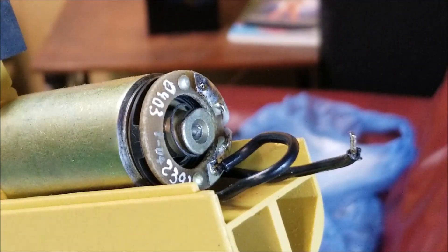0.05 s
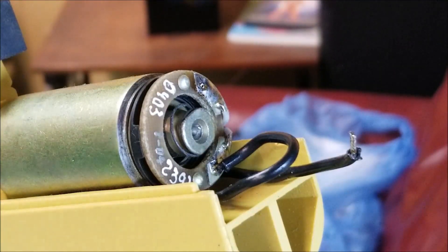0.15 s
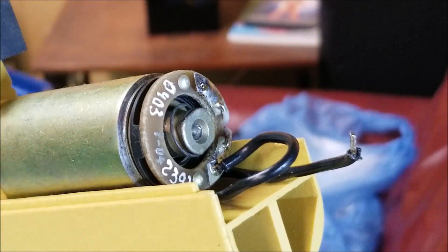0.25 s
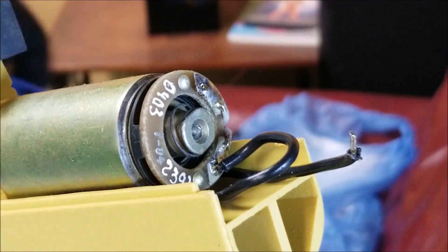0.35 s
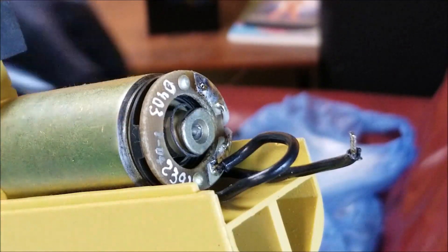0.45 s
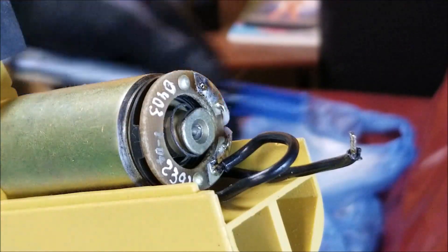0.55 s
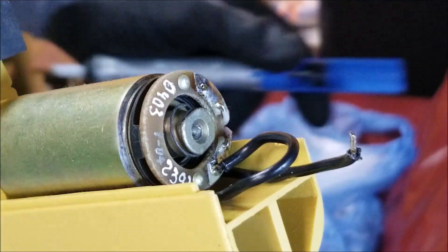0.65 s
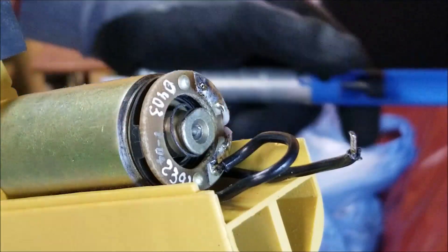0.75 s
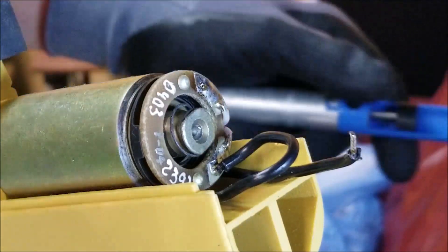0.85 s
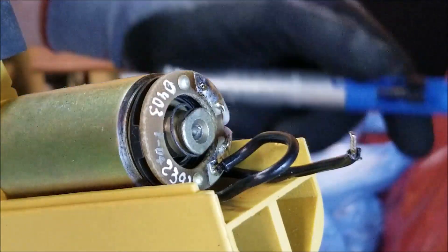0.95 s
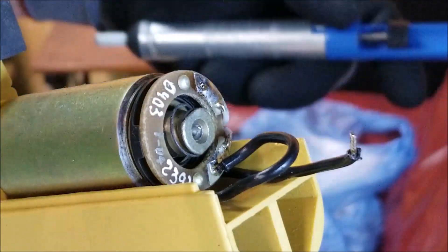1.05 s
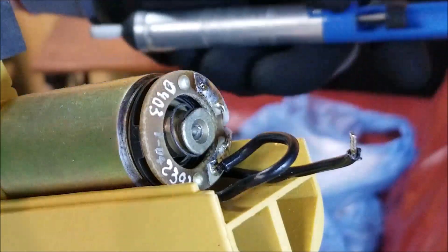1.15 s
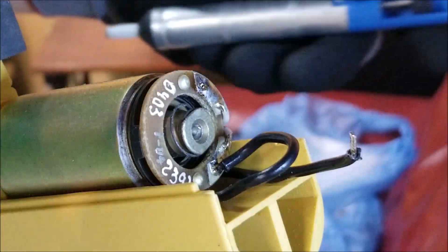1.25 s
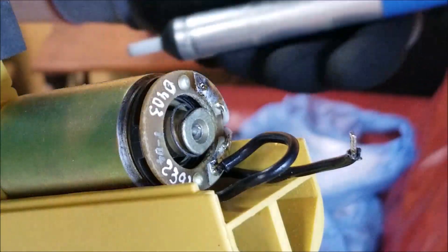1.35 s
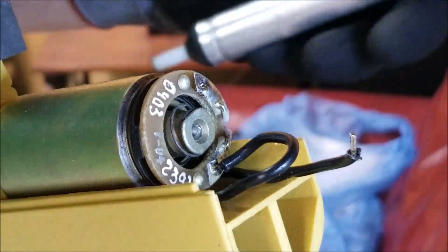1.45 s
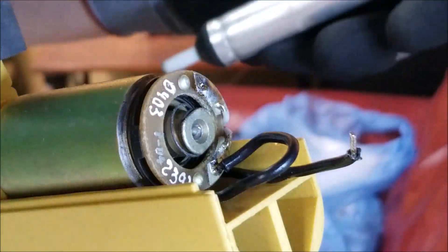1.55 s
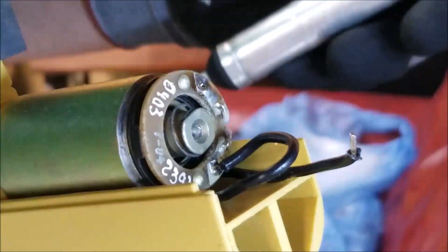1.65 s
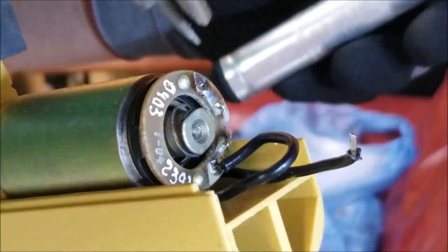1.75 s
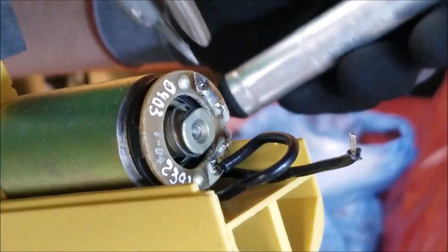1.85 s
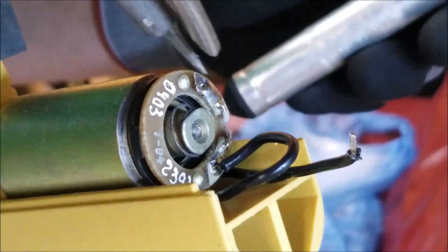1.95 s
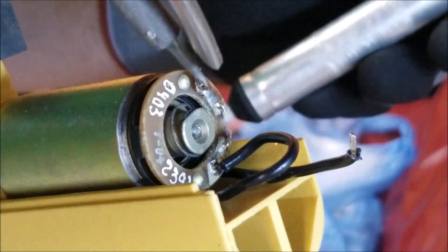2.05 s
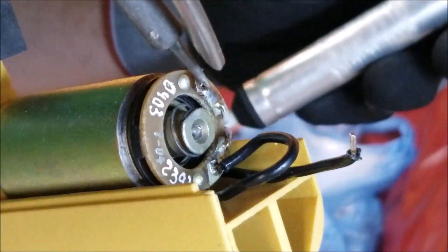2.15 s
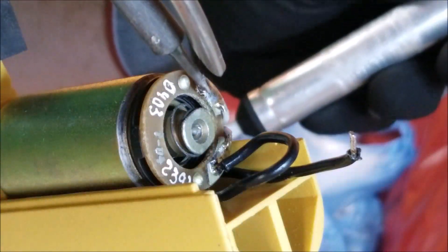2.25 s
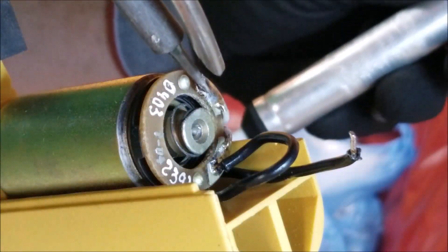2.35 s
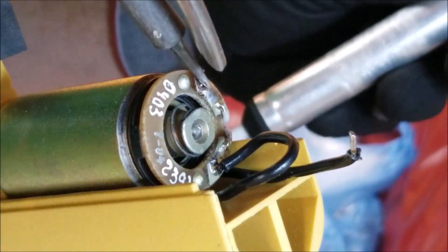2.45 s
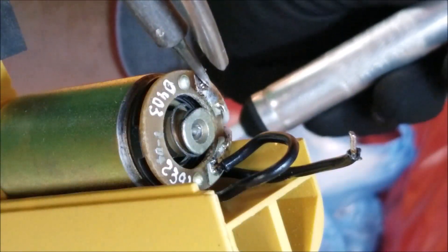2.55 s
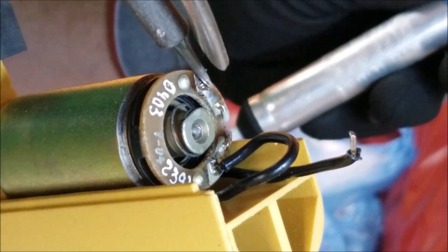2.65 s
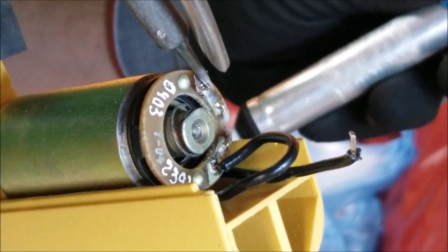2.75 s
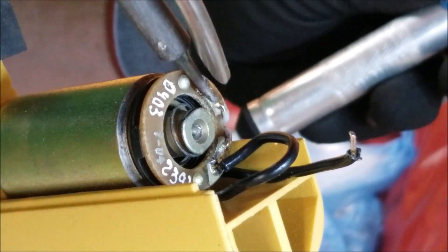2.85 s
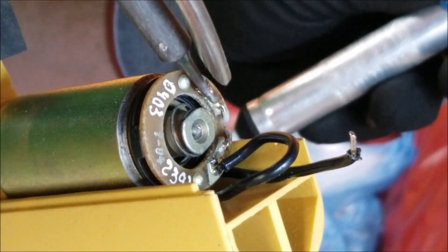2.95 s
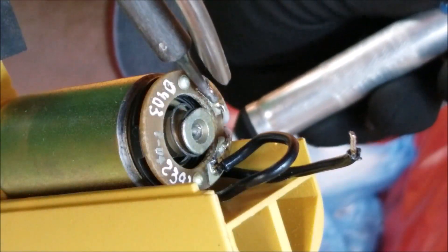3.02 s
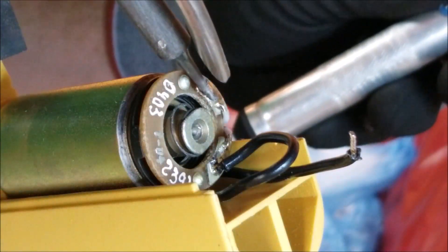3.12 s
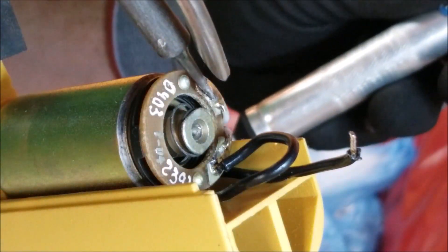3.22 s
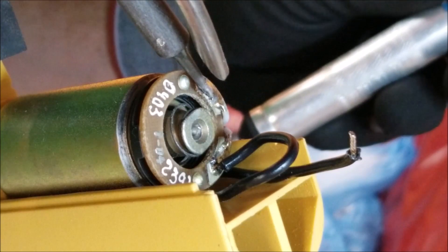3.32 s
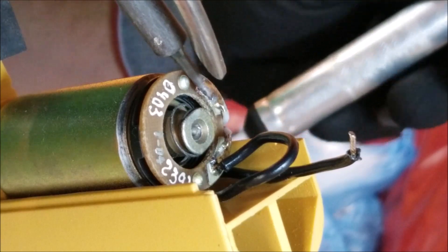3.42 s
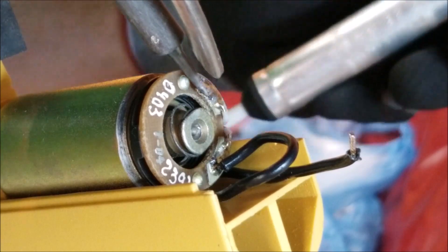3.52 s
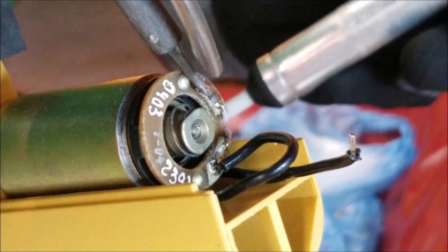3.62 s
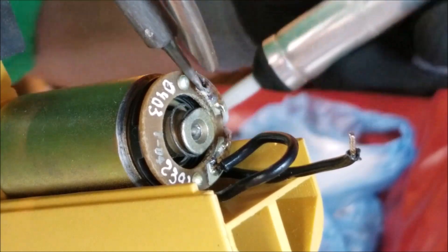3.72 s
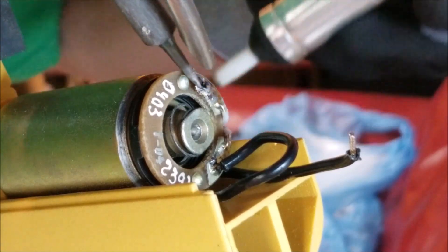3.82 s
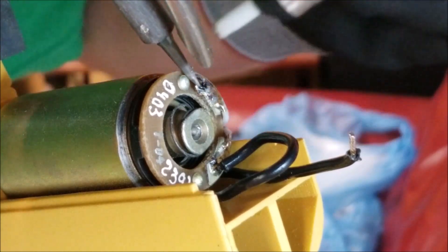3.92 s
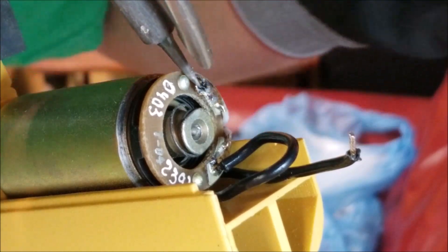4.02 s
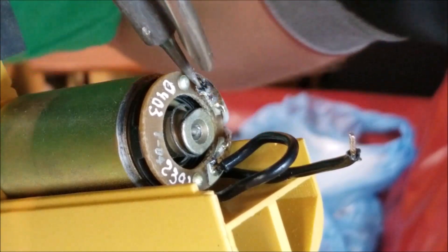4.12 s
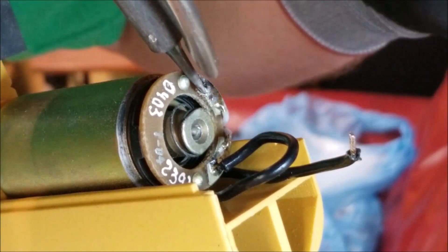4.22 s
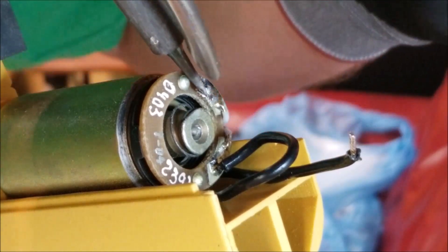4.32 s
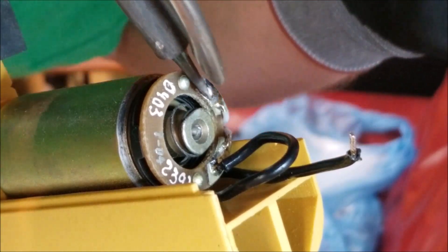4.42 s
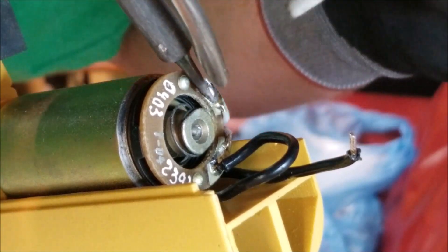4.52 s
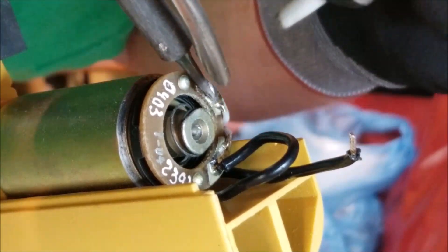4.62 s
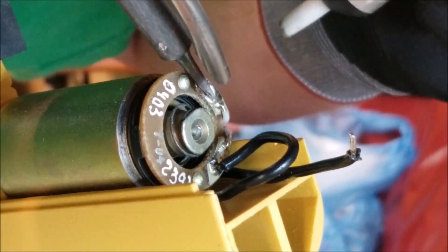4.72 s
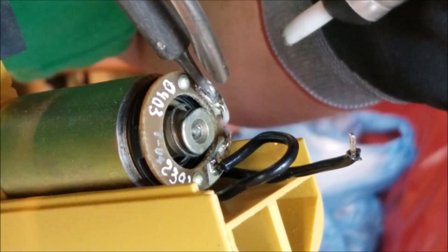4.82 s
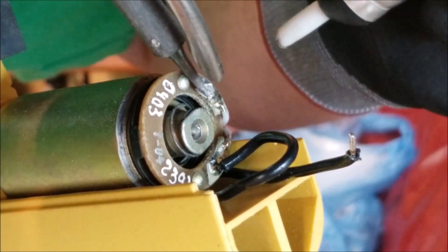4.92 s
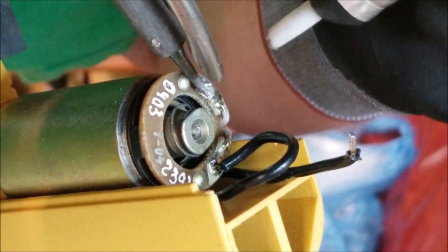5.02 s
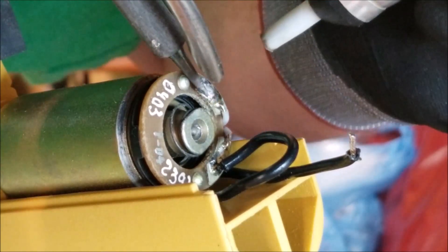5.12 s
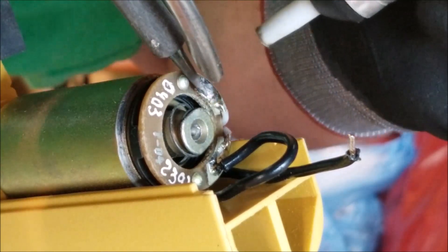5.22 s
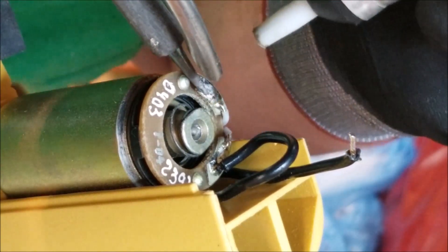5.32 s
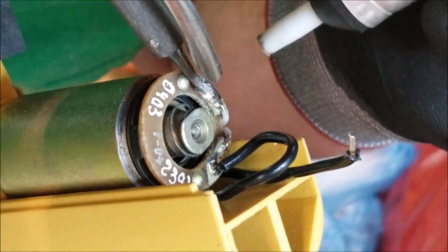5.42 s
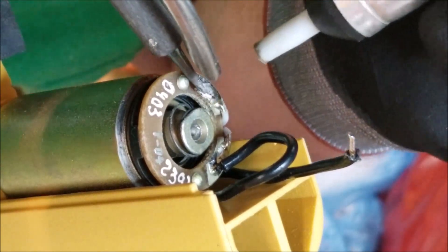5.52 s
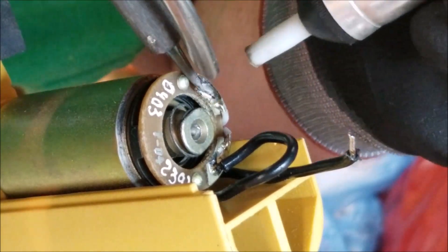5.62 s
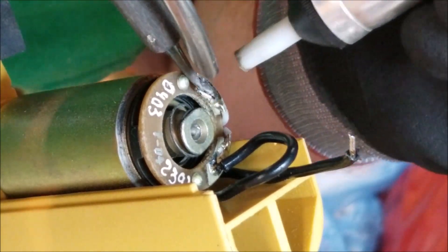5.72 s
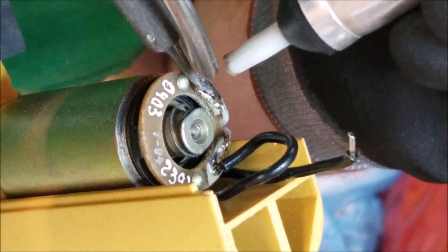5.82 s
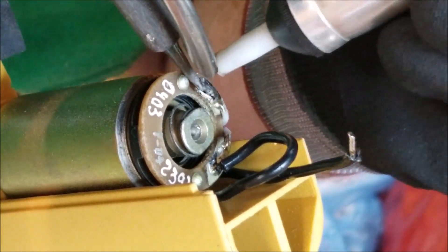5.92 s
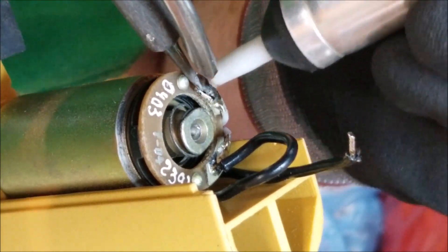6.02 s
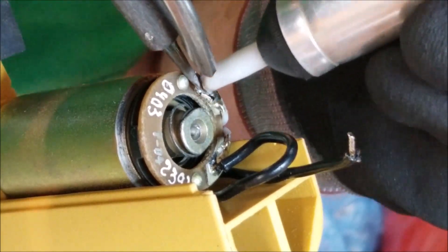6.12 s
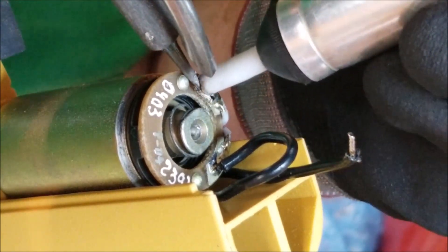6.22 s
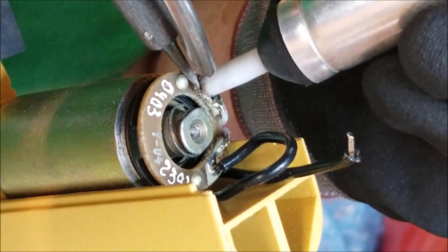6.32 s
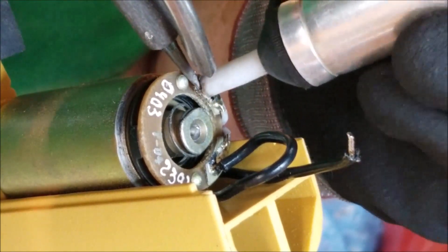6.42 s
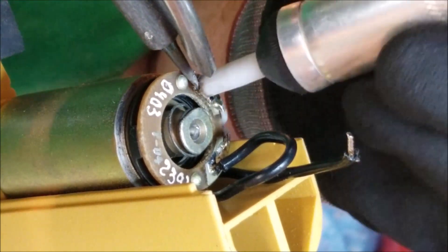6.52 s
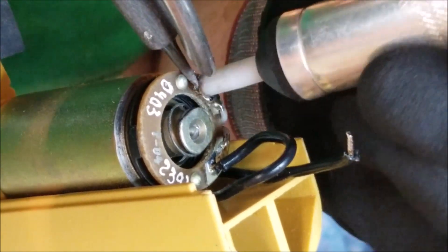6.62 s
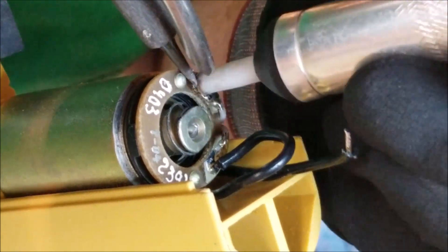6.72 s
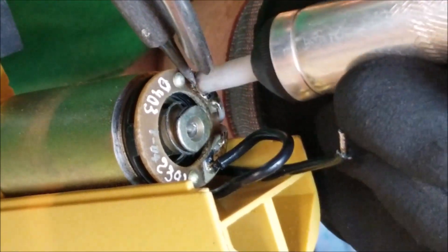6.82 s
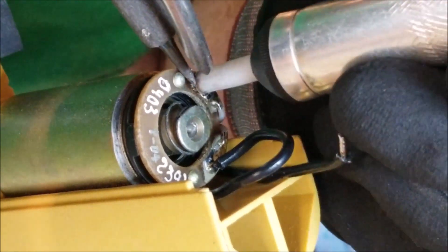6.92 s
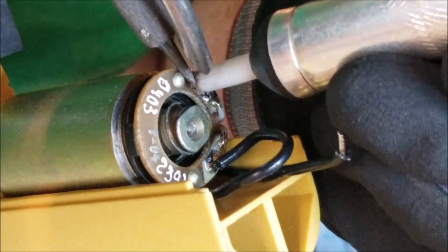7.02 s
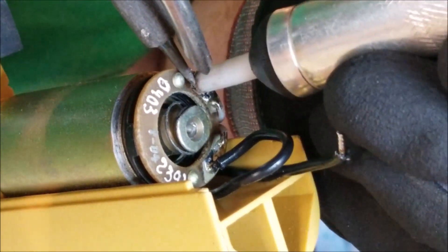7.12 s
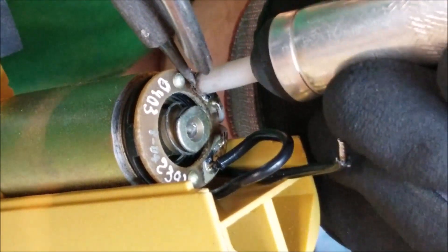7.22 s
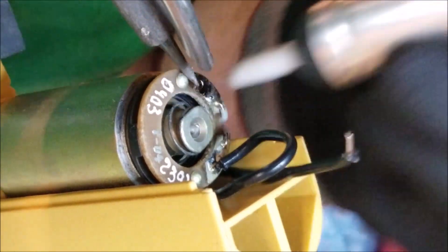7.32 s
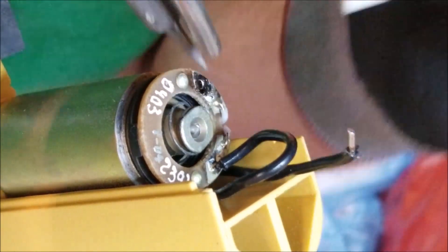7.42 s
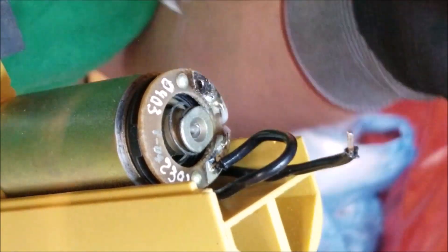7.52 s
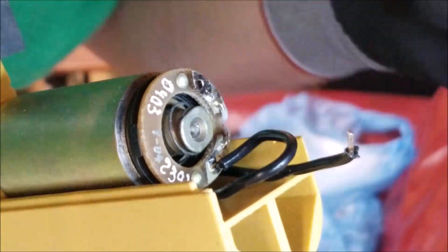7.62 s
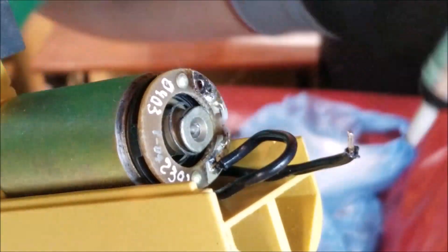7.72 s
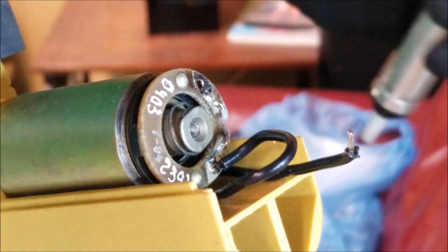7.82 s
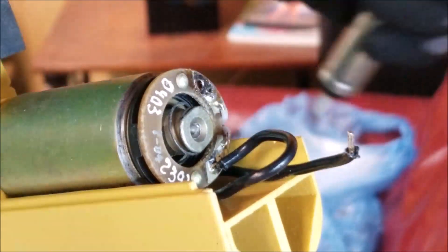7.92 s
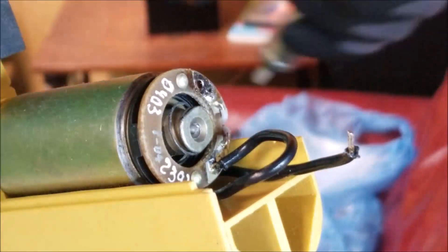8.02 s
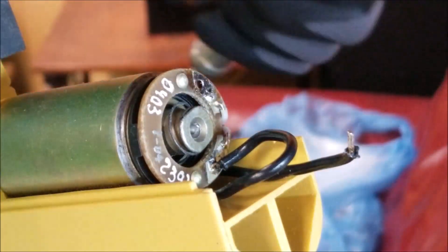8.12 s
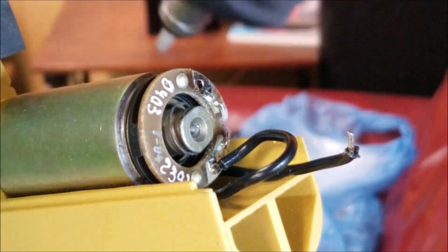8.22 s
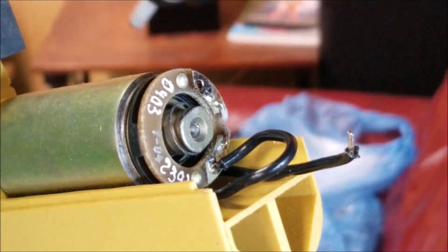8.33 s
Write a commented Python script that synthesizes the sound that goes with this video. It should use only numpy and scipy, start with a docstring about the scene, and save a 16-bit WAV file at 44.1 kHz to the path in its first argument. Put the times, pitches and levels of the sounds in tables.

```python
"""A spring-loaded solder sucker fires once, heard close by: scraping noise rings its tube, metal blows
crack and pop, and decaying sines are the spring. A light metal tick follows as the tools lift off the joint.
Soft bumps come through the bench as dull decaying sines. Around them mains equipment buzzes in sine harmonics,
and a fan runs as coloured noise with motor tones. Hands move near the microphones: the steady levels follow
them, and the high hiss is combed by an echo off the hand."""
import sys
import numpy as np
from scipy import signal
from scipy.fft import rfft, irfft
from scipy.io import wavfile
from scipy.ndimage import uniform_filter1d, map_coordinates

SR = 44100
rng = np.random.default_rng(int(sys.argv[2]) if len(sys.argv) > 2 else 0)


def wav_out(sig):
    """Save sig, one row per channel (or a flat mono array), as 16-bit PCM at SR to the path in sys.argv[1]."""
    wavfile.write(sys.argv[1], SR, np.round(np.clip(np.atleast_2d(sig).T, -1, 1) * 32767).astype(np.int16))


N = 368764
TIME = np.arange(N) / SR
MAINS_HZ = 60.003

# mains harmonics that stand out, before hands and wavering: multiple, left level/dB, right level/dB
MAINS_LINES = [(2, -55.5, -56.5), (3, -58, -59), (4, -69, -64), (5, -72, -67), (7, -78, -92), (8, -80, -67),
               (9, -66.5, -88), (10, -61.5, -64.5), (11, -73.5, -72), (12, -73, -66), (13, -71.5, -88),
               (14, -70.5, -80.5), (15, -70.5, -80.5), (22, -70, -73), (24, -65.5, -71), (27, -68.5, -68.5),
               (30, -67.5, -80), (44, -68.5, -86)]
# lag of the left microphone behind the right: f/Hz, lag/rad
LEFT_LAG = [(250, 0), (800, .3), (1500, 2), (2400, 3.1), (6200, 3), (7200, 1.6), (8600, .3), (9800, 1.4),
            (11000, -.5), (12200, 0), (14500, -2.6)]
# a hand sweeps past the microphones: t/s, half length/s, change of hiss level/dB,
# extra change of its lower part/dB, shortest detour of the echo/ms
HAND_SWEEPS = [(0.822, .22, 3, -1, 0.35), (1.397, 0.224, 2.5, 0.2, 0.33), (7.685, 0.154, -1.7, 3, 0.54),
               (8.14, 0.22, 2, .3, 0.64)]
# the fan's rush with hands away, with hands at the joint, and the change while one sweeps past
RUSH_AWAY_DB, RUSH_NEAR_DB, RUSH_SWEEP_DB = -5, -1.03, -0.34


def amp(db):
    """Decibels to gain."""
    return 10 ** (np.asarray(db) / 20)


def unit(x):
    """Scales to rms 1."""
    return x / np.sqrt(np.mean(x ** 2) + 1e-20)


def at_hz(points, hz):
    """Reads a spectrum on a log-frequency axis."""
    f, value = np.transpose(points)
    return np.interp(np.log(hz + 1), np.log(f + 1), value)


def pan(lean_db):
    """Left and right gains for a level difference, left minus right."""
    return amp(np.array([[.5], [-.5]]) * lean_db)


def add(mix, s, sound):
    """Mixes a sound in at time s."""
    part = mix[:, round(s * SR):][:, :sound.shape[-1]]
    part += sound[..., :part.shape[1]]


def drift(rate_hz):
    """Slow random wander of rms 1; its spectrum falls off exponentially with the given rate."""
    coarse_hz = np.fft.rfftfreq(N // 100, 100 / SR)
    z = rfft(rng.standard_normal(N // 100)) * np.exp(-coarse_hz / rate_hz)
    slow = unit(irfft(z))
    return np.interp(np.arange(N) / 100, np.arange(len(slow)), slow)


def noise(colour, size, slant=1):
    """Coloured noise at two microphones; sound from the side (slant 1) reaches them out of step."""
    # likeness of the two microphones: f/Hz, correlation (-1 to 1)
    likeness = [(60, 0), (200, 0.77), (450, 0.63), (800, 0), (1300, -0.37), (2600, -0.21), (4000, 0.18),
                (6300, 0.35), (7200, 0.55), (8700, 0), (14500, 0.34)]
    # balance of the two microphones: f/Hz, left minus right level/dB
    balance = [(60, -7), (250, 5.5), (450, 3.5), (750, -3.5), (1200, 3.5), (2400, 1.5), (3500, 0),
               (6000, 1.5), (8000, 2.5), (12000, 2.5), (15500, 1)]
    hz = np.fft.rfftfreq(size, 1 / SR)
    a, b = rfft(rng.standard_normal((2, size)))
    same = np.clip(at_hz(likeness, hz), -1, 1)
    left = a * np.exp(-1j * slant * at_hz(LEFT_LAG, hz))
    right = same * a + np.sqrt(1 - same ** 2) * b
    return unit(irfft(np.array([left, right]) * amp(at_hz(colour, hz)) * pan(at_hz(balance, hz)), size))


def highs(x, edge_hz):
    """Keeps what lies above the edge."""
    return signal.sosfilt(signal.butter(2, min(edge_hz, SR / 3), "high", fs=SR, output="sos"), x)


def sucker(slam_s=7.068, spring_db=-58):
    """Scrapes, hard contacts (the tick's among them) and the spring that rings on after the slam."""
    # scrapes of the piston: t/s, length/s, level/dB, left minus right/dB, tube ring/dB, treble/dB
    strokes = [(7.0502, 0.0079, -33.5, -2, 1, -2), (7.0582, 0.0088, -25, 5.5, -1.5, 1),
               (7.067, 0.0053, -32.5, 0, -19, -6), (7.07, 0.0045, -33, -12, -10, -2)]
    # blows of metal on metal: t/s, level/dB, t60/s, hollow pop relative to level/dB, low edge f/Hz
    hits = [(7.058, -23.5, 0.0042, 0, 400), (7.0579, -30, 0.0034, -23, 2000),
            (7.0661, -17, 0.014, -15, 400), (7.0677, -17.5, 0.0048, 4, 700), (7.3438, -43, .008, -40, 9000),
            (7.3450, -36, .007, -40, 5000)]
    # ringing modes of spring and barrel, most of them between 1.5 and 2.5 kHz:
    # f/Hz, level relative to spring_db/dB, t60/s
    spring_modes = [(1530, -4, .2), (1725, -1, .28), (1815, -2, .25), (2030, 6, 0.24), (2150, -4, .3),
                    (2270, 0, 0.38), (2450, -4, .3), (3320, -16, .7), (4630, -14, .36), (5766, -13, .28),
                    (6245, -19, .7), (12440, -16, .46)]
    out, t = np.zeros((2, N)), np.arange(SR) / SR
    for s, *stroke in strokes:
        add(out, s, scrape(*stroke))
    for s, *hit in hits:
        add(out, s, blow(*hit))
    for hz, db, t60 in spring_modes:
        swing = np.sin(2 * np.pi * (hz * t + rng.random((2, 1))))  # own phase at each microphone
        add(out, slam_s, amp(spring_db + db - 60 * t / t60) * swing)
    return out


def scrape(length, level_db, lean_db, ring_db, treble_db, grit=0.28):
    """The piston chatters along the wall and rings the tube."""
    # colour of the rubbing: f/Hz, density/dB per Hz
    rub_colour = [(100, -3), (280, -7), (420, -2), (800, -1), (1500, -8), (2500, 1.5), (4300, 2),
                  (6000, -4), (7400, 1), (9300, -5.5), (12300, 7.5), (14500, -3), (16000, -11)]
    # resonances of the tube and its air: f/Hz, width/Hz, left level/dB, right level/dB
    tube_modes = [(2400, 300, 0.5, -5), (3300, 120, -4, -1), (4900, 300, -11, -10), (6100, 460, -12, -1),
                  (12000, 350, -15, -20)]
    t = np.arange(2048) / SR
    push = np.clip(t / 0.00029, 0, 1) * np.exp(-np.maximum(t - length, 0) / 0.00061)
    roughness = unit(uniform_filter1d(rng.standard_normal(len(t)), 20))
    chatter = unit(np.exp(grit * roughness))
    rub = noise(rub_colour, len(t), slant=0.72) * chatter
    rub = (rub + (amp(treble_db) - 1) * highs(rub, 7000)) * push
    ring = np.zeros_like(rub)
    for hz, width, left_db, right_db in tube_modes:
        mode = np.exp(-np.pi * width * t) * np.sin(2 * np.pi * hz * t)
        rung = np.array([unit(signal.fftconvolve(side, mode)[:len(t)]) for side in rub])
        ring += amp([[left_db], [right_db]]) * rung
    sound = unit(unit(rub) * pan(lean_db) + amp(ring_db) * unit(ring))
    return amp(level_db) * sound * np.sqrt(np.mean(push ** 2))


def blow(level_db, t60, pop_db, edge_hz, pop_lean_db=9, pop_hz=1700, pop_t60=0.0048):
    """A hard contact: a short crack and the pop of the air in the barrel."""
    # colour of the crack: f/Hz, density/dB per Hz
    crack_colour = [(200, -13), (300, -8), (430, 8.5), (800, -4), (1200, 4), (2200, -2), (3500, 6),
                    (4800, -3), (6200, 5), (7050, 3), (7700, -5), (8300, 2.5), (9500, -6), (12500, 5),
                    (16000, -12)]
    t = np.arange(2048) / SR
    fade = amp(-60 * t / t60)
    crack = unit(highs(noise(crack_colour, len(t), slant=0.58), edge_hz) * fade)
    crack = crack * np.sqrt(np.mean(fade ** 2))
    pop = np.sin(2 * np.pi * pop_hz * t) * amp(pop_db - 60 * t / pop_t60) * pan(pop_lean_db)
    return amp(level_db) * (crack + pop)


def tick():
    """A small steel tool rings for a few milliseconds."""
    # ringing modes: t/s, f/Hz, peak level/dB, t60/s
    tool_modes = [(7.345, 4650, -50, .007), (7.345, 5800, -42, .008), (7.345, 7700, -44, 0.0065)]
    out, t = np.zeros((2, N)), np.arange(2048) / SR
    for s, hz, db, t60 in tool_modes:
        add(out, s, amp(db - 60 * t / t60) * np.sin(2 * np.pi * hz * t))
    return out


def bench():
    """Each bump gives a few dull swings, the same at both microphones."""
    # bumps through the bench: t/s, level before the soft onset/dB, f/Hz, t60/s
    bumps = [(4.912, -43, 85, 0.08), (6.2814, -35, 350, 0.017), (6.284, -27.5, 115, 0.032),
             (6.2893, -43, 62, .07), (7.0555, -26.5, 176, 0.045), (7.0683, -27, 172, 0.028)]
    out, t = np.zeros((2, N)), np.arange(SR // 4) / SR
    for s, db, hz, t60 in bumps:
        onset = 1 - np.exp(-t / 0.00085)
        add(out, s, amp(db - 60 * t / t60) * np.sin(2 * np.pi * hz * t) * onset)
    return out


def nearby(x):
    """Adds the first echoes off the things on the bench, which ripple the spectrum."""
    # echoes: delay/ms, left gain, right gain
    echoes = [(1.13, -0.21, 0.0081), (1.9, 0.3, -0.059), (3.1, -0.18, 0.39), (4.7, 0.4, 0.15),
              (7.3, 0.11, 0.13), (10.6, -0.17, -0.000074)]
    out = x.copy()
    for delay_ms, left, right in echoes:
        add(out, delay_ms / 1000, x * np.array([[left], [right]]))
    return out


def closeness(arrive_s=0.36, arrive_length_s=0.49, leave_s=7.14, leave_length_s=.3, linger=0.83):
    """How near the hands are to the joint, 0-1: approach, hold, partial retreat down to linger."""
    arrived = np.clip((TIME - arrive_s) / arrive_length_s, 0, 1)
    left = np.clip((TIME - leave_s) / leave_length_s, 0, 1)
    return arrived - (1 - linger) * left


def passing(s, half_length):
    """One sweep of a hand swells and fades, 0-1."""
    return np.exp(-((TIME - s) / half_length) ** 2)


def with_hands(away_db, near_db, sweep_db):
    """Level in dB of a steady sound with hands away and at the joint, plus a change in each sweep."""
    sweeping = sum(passing(s, half_length) for s, half_length, *_ in HAND_SWEEPS)
    return away_db + (near_db - away_db) * closeness() + sweep_db * sweeping


def tone(hz, left_db, right_db, wander):
    """A steady line, its phase set back at the left microphone; wander shifts its timing in seconds."""
    angle = 2 * np.pi * (hz * (TIME + wander) + rng.random())
    left = amp(left_db) * np.sin(angle - at_hz(LEFT_LAG, hz))
    right = amp(right_db) * np.sin(angle)
    return np.sqrt(2) * np.array([left, right])


def buzz_lines(count=54, right_db=-9.5, scatter_db=2):
    """The other harmonics scatter about one smooth curve: rows of (multiple, left dB, right dB)."""
    # curve of the buzz, before hands and wavering: f/Hz, left level/dB
    buzz_curve = [(360, -78), (1200, -72.5), (1600, -77.5), (2300, -76), (3300, -83.5)]
    multiples = np.setdiff1d(2 + np.arange(count), [round(row[0]) for row in MAINS_LINES])
    scatter = scatter_db * rng.standard_normal((len(multiples), 2)).T
    left, right = at_hz(buzz_curve, multiples * MAINS_HZ) + scatter
    return list(zip(multiples, left, right + right_db))


def hum(waver_db=1.5, jitter_s=.00003, buzz_from_hz=520, buzz_waver_db=2.0):
    """Mains harmonics sound beside motor tones; their levels shift as the hands move."""
    # multiples that change little as the hands arrive and rise in a sweep
    sweep_multiples = (3, 12, 15)
    # tones of turning motors, the last from the fan's blades: f/Hz
    motor_hz = [58.94, 75., 91.5, 131.3, 150.7, 471.5]
    # their levels before hands and wavering: left level/dB, right level/dB
    motor_levels = [(-53, -55.5), (-69, -75), (-89, -74), (-59, -59), (-68.5, -77), (-58.5, -70.5)]
    drone_db = with_hands(away_db=-5, near_db=-.5, sweep_db=0.1)
    swept_db = with_hands(away_db=-1.5, near_db=-0.8, sweep_db=1.5)
    buzz_db = with_hands(away_db=-8, near_db=0.07, sweep_db=-1.5)
    wander, out = jitter_s * drift(2.7), np.zeros((2, N))
    for multiple, left_db, right_db in MAINS_LINES + buzz_lines():
        hz = round(multiple) * MAINS_HZ
        level_db = buzz_db if hz > buzz_from_hz else drone_db
        if round(multiple) in sweep_multiples:
            level_db = swept_db
        # shorter waves are more easily disturbed
        level_db = level_db + buzz_waver_db * min(np.sqrt(hz / 1500), 1) * drift(8.8)
        out += tone(hz, left_db, right_db, wander) * amp(level_db)
    for hz, (left_db, right_db) in zip(motor_hz, motor_levels):
        line = tone(hz, left_db, right_db, 0.00015 * drift(3.8))
        out += line * amp(drone_db + waver_db * min(hz / 200, 1) * drift(6.5))
    return out


def air(level_db=-55.5, flutter_db=0.75, rasp=0.14, rasp_sharp=3.1, rasp_from_hz=1200):
    """The fan's rush; its upper part rasps in step with the mains."""
    # colour of the moving air: f/Hz, density/dB per Hz
    rush_colour = [(20, -8), (45, -3), (80, 2.5), (170, -1), (260, -4.5), (330, -0.5), (390, -5),
                   (460, -4.5), (620, -1.5), (750, -4), (950, -6.5), (1400, -5.5), (1900, -8), (2200, -10),
                   (2800, -9.5), (3600, -14), (6000, -22.5)]
    hands_db = with_hands(RUSH_AWAY_DB, RUSH_NEAR_DB, RUSH_SWEEP_DB)
    rush = noise(rush_colour, N) * amp(level_db + hands_db + flutter_db * drift(22))
    # filtered both ways, so it stays in step
    backward = highs(rush[:, ::-1], rasp_from_hz)
    upper = highs(backward[:, ::-1], rasp_from_hz)
    angle = 2 * np.pi * MAINS_HZ * TIME
    # two unevenly spaced rattles in each cycle
    beats = sum(np.exp(rasp_sharp ** 2 * (np.cos(angle - lag) - 1)) for lag in (0, 2.5))
    return rush + upper * (unit(1 + 2 * rasp * beats) - 1)


def whistles():
    """Air noise caught in narrow resonances: soft, fluttering tones."""
    # resonances, levels before the hands: f/Hz, width/Hz, left level/dB, right level/dB
    resonances = [(462.6, 13, -68, -78), (1908, 35, -68.5, -69), (2587, 48, -87, -80)]
    hz, out = np.fft.rfftfreq(N, 1 / SR), np.zeros((2, N))
    rush = rfft(rng.standard_normal((2, N)))
    for centre_hz, width, left_db, right_db in resonances:
        narrow = rush / (1 + ((hz - centre_hz) / (width / 2)) ** 2)
        out += amp([[left_db], [right_db]]) * unit(irfft(narrow, N))
    return out * amp(with_hands(RUSH_AWAY_DB, RUSH_NEAR_DB, RUSH_SWEEP_DB))


def hand_echo(rest_detour_ms=0.98, rest_echo=0.07, sweep_echo=.26):
    """Each sweep changes the hiss level, strengthens its echo and shortens the echo's path."""
    level_db = with_hands(away_db=-1.1, near_db=-0.4, sweep_db=0.5)
    lower_db = with_hands(away_db=-2.5, near_db=.5, sweep_db=0.5)
    detour_ms, echo = rest_detour_ms, rest_echo
    for s, half_length, lift_db, low_lift_db, shortest_ms in HAND_SWEEPS:
        near = passing(s, half_length)
        level_db = level_db + lift_db * near
        lower_db = lower_db + low_lift_db * near
        detour_ms = detour_ms + (shortest_ms - detour_ms) * near
        echo = echo + sweep_echo * near
    return level_db, lower_db, detour_ms, echo


def hiss(base_db=-58.5, flutter_db=0.7, split_hz=8000):
    """High hiss, combed by its own echo off the moving hand."""
    # colour of the hiss: f/Hz, density/dB per Hz
    hiss_colour = [(2000, -10), (3500, -6.5), (4700, -0.5), (6300, 0.5), (6700, -2), (7600, -11),
                   (8700, -10), (9900, -1), (10900, 1.5), (11500, 1), (12200, 3.5), (13800, -3.5),
                   (15600, -7)]
    level_db, lower_db, detour_ms, echo = hand_echo()
    direct = unit(nearby(noise(hiss_colour, N)))
    below_split = 1 / (1 + (np.fft.rfftfreq(N, 1 / SR) / split_hz) ** 8)
    lower = irfft(rfft(direct) * below_split, N)
    direct = direct + (amp(lower_db) - 1) * lower
    late = np.arange(N) - detour_ms * SR / 1000  # read position in samples
    bounced = np.array([map_coordinates(side, [late], order=3, mode="nearest") for side in direct])
    combed = (direct + echo * bounced) / np.sqrt(1 + echo ** 2)
    return combed * amp(base_db + level_db + flutter_db * drift(12))


def room(x, build_s=0.0091, clutter=1.2, clutter_s=0.022):
    """A small room: quick scatter off the clutter, then dense reflections, each band dying at its own speed."""
    # decay of the room: f/Hz, t60/s
    decay = [(150, 0.26), (800, 0.22), (2000, 0.51), (5000, 0.5), (9000, 0.43), (15000, 0.29)]
    # colour of the reflections: f/Hz, level/dB
    tail_colour = [(100, 11.5), (800, 1.5), (2000, 0.5), (3300, -3.5), (6000, -0.5), (9000, -4),
                   (15000, -7)]
    hz, t, z = signal.stft(rng.standard_normal((2, SR)), SR, nperseg=256)
    early = (1 - np.exp(-t / build_s)) * (1 + clutter * np.exp(-t / clutter_s))
    fade_db = at_hz(tail_colour, hz)[:, None] - 60 * t / at_hz(decay, hz)[:, None]
    tail = signal.istft(z * amp(fade_db) * early, SR, nperseg=256)[1]
    return signal.fftconvolve(x, tail / np.linalg.norm(tail[0]), axes=1)[:, :N]


def scene(room_db=-15):
    """The shot, the tick and their echoes over the bumps and the steady workshop."""
    tools = nearby(sucker() + tick())
    steady = hum() + air() + whistles() + hiss()
    return tools + amp(room_db) * room(tools) + bench() + steady


def record(dry, edge_hz=15780):
    """The recorder's band limit: a steep low-pass."""
    lowpass = signal.firwin(511, edge_hz, window=("kaiser", 9), fs=SR)
    return signal.oaconvolve(dry, lowpass[None], "same")


dry = scene()
out = record(dry)
wav_out(out)
```